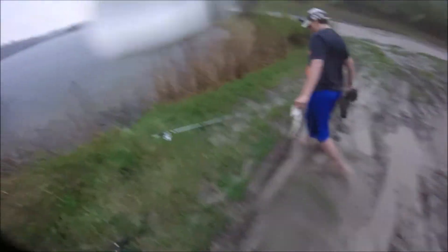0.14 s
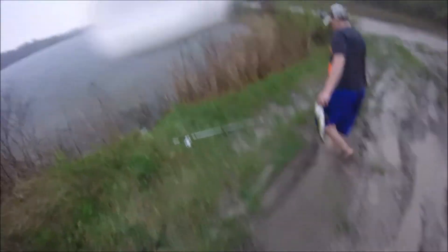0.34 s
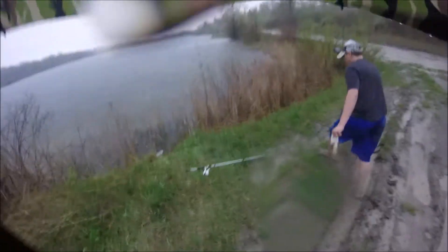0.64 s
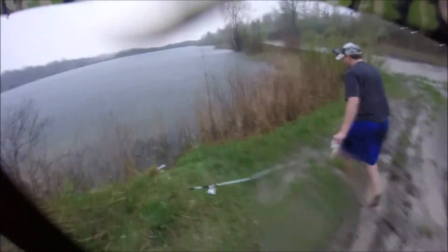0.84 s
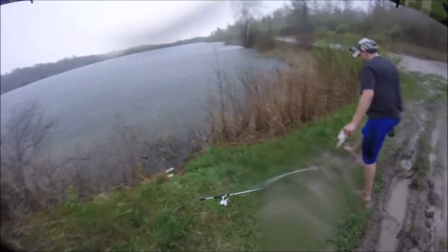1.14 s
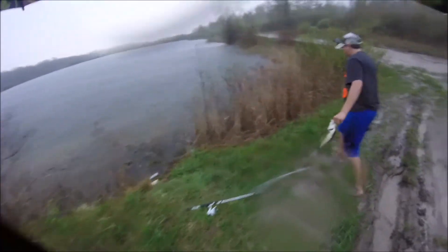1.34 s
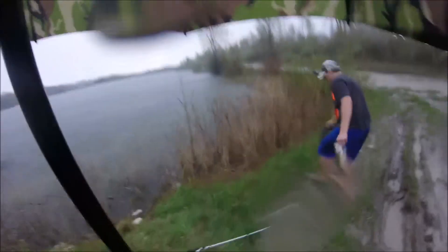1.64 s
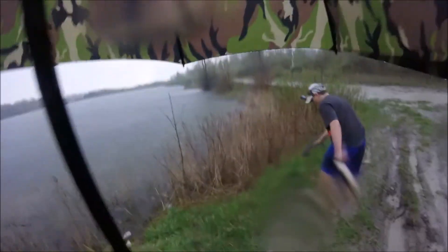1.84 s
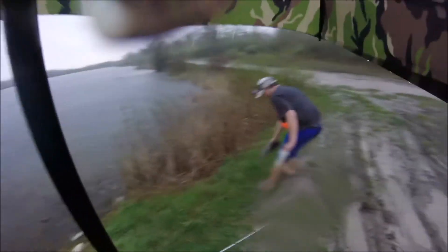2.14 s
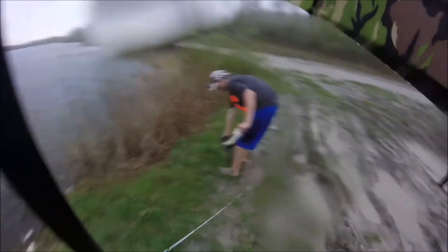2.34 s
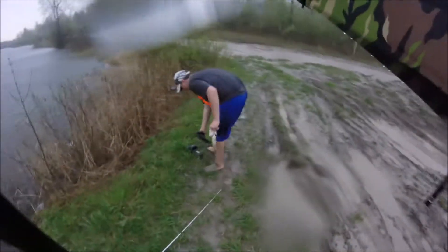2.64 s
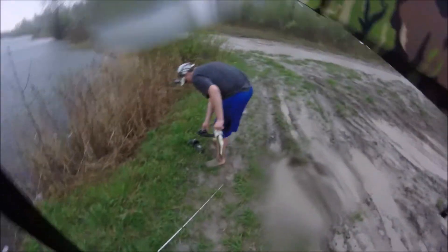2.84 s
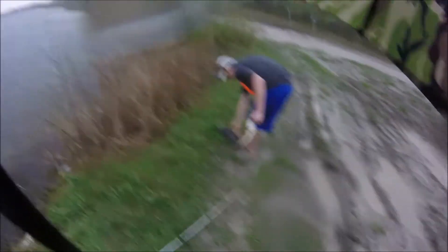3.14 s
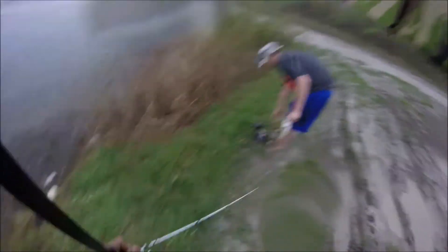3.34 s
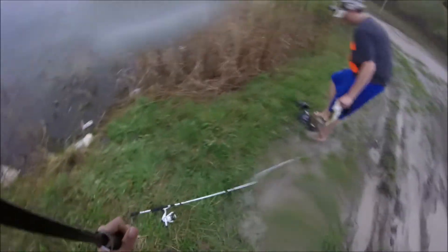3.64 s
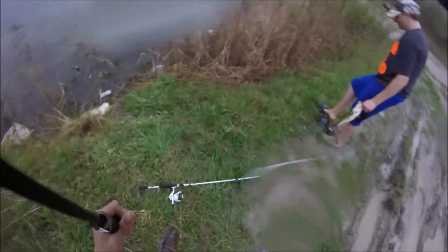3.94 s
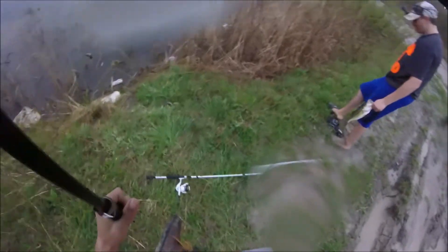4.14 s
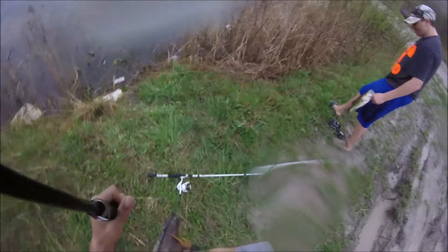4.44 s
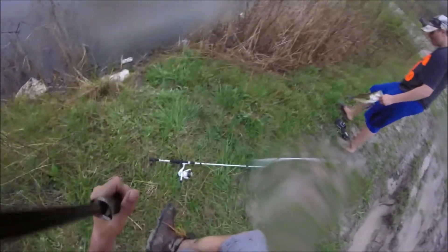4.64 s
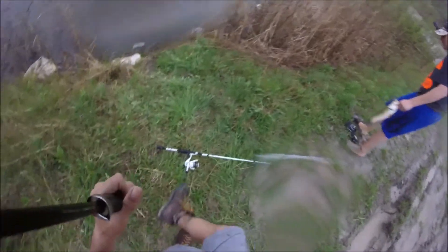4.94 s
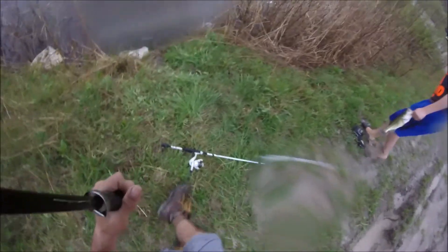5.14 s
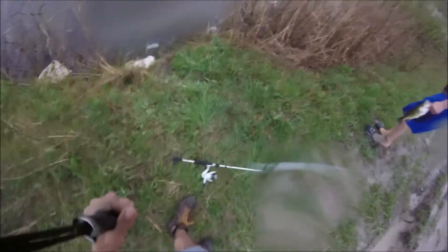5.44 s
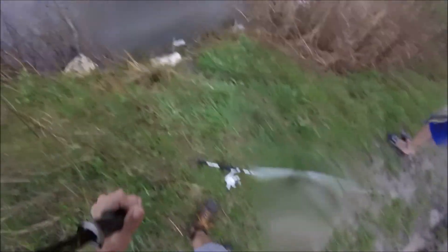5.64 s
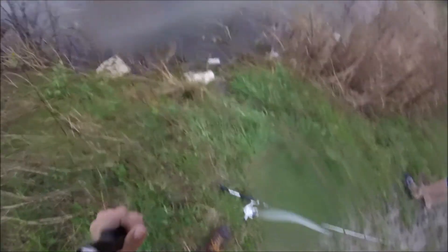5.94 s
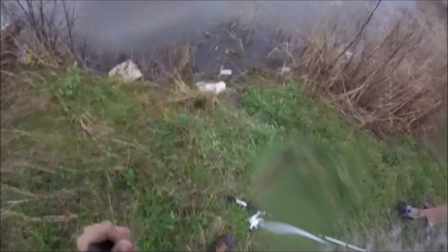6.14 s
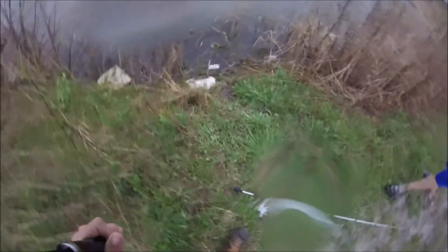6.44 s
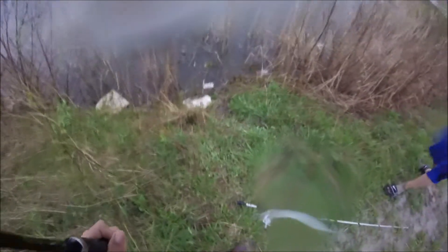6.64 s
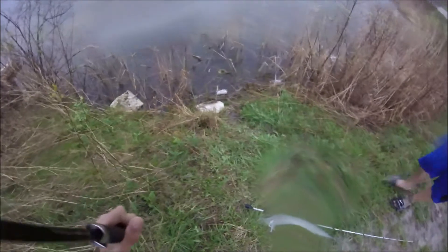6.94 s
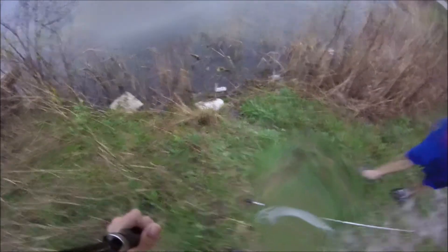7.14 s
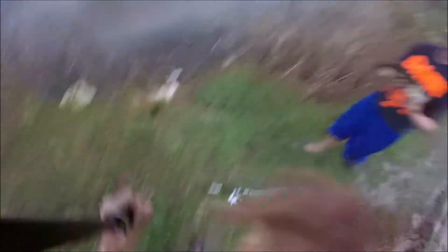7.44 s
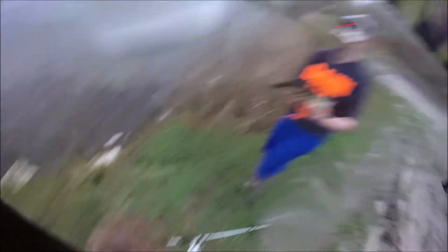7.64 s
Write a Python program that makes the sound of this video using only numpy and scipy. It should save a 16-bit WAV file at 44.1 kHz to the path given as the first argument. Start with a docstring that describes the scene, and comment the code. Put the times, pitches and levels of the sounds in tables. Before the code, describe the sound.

Close rain drums crisply on umbrella cloth outdoors; a hard clack rings out near one second, then dull bumps and brief rubs follow.

```python
"""Rain on an umbrella held just above the microphone, on a grassy lake shore.
Each drop rings the taut cloth for a few milliseconds and bursts into spray, with bright splashes on standing water.
The shaft clacks against the camera: a hard crack, its rebound and ringing modes; the ribs chatter as noisy burrs.
Handling adds sinking knocks, rubs and scrapes made of random slips, and low rumble of filtered noise.
Behind it all, far rain on grass and water is a soft wash of coloured noise."""
import sys
import numpy as np
from scipy import signal
from scipy.fft import rfft, irfft
from scipy.io import wavfile

SR = 44100
rng = np.random.default_rng(int(sys.argv[2]) if len(sys.argv) > 2 else 0)


def pcm_store(signal):
    """Save signal as 16-bit PCM."""
    levels = np.round(np.clip(np.atleast_2d(signal), -1, 1) * 32767)
    wavfile.write(sys.argv[1], SR, levels.astype(np.int16).T)


N = 344421  # length [samples]

# relative strength of the rain on the canopy: (time [s], level [dB])
SHOWER_LEVEL = [(0, -38.5), (0.93, -39), (1.1, -41), (1.7, -42), (2.55, -44), (3.65, -40), (4.38, -43.5),
                (4.55, -42), (5.6, -42), (6.2, -41), (6.4, -39.5), (6.67, -39), (6.69, -45), (6.82, -45.5),
                (6.9, -41), (7.8, -40.5)]
# brief flurries of denser rain: (time of the height [s], boost [dB])
RAIN_FLURRIES = [(3.1, 2), (5.89, 4), (7.27, 1.5)]
FLURRY_HALF_S = 0.045  # half-width of a flurry
# as the umbrella tips, the near drops move between taut and slacker cloth: (time [s], median ring [Hz])
CLOTH_PITCH = [(0, 2046), (2.9, 2202), (3.6, 1704), (6.0, 1478), (7.8, 1704)]
# heavy drops: (time [s], peak of the cloth sound before its spray [dB], ring of the cloth [Hz])
HEAVY_DROPS = [(0.0955, -27, 2720), (0.1146, -28, 1280), (0.1261, -24.5, 1450), (0.194, -25.5, 1370),
               (0.2364, -31, 1300), (0.25, -28, 1350), (0.26, -24.5, 2550), (0.2732, -24.5, 1370),
               (0.3542, -26, 2600), (0.3895, -26.5, 1360), (0.3983, -24.5, 2740), (0.4494, -20, 2500),
               (0.5332, -25.5, 2630), (0.5791, -28.5, 2550), (0.617, -30.5, 1340), (0.6522, -25.5, 2600),
               (0.8593, -26, 1370), (0.906, -26, 2600), (1.1319, -26, 2700), (1.2292, -23.5, 2700),
               (1.257, -29, 2650), (1.275, -30, 1400), (1.3177, -29.5, 1310), (1.5687, -31, 2720),
               (1.6205, -39, 1390), (1.6473, -31, 2670), (1.8432, -26.5, 1310), (2.145, -28.5, 2720),
               (2.342, -28.5, 1470), (2.4192, -34, 1370), (2.432, -27.5, 2650), (2.822, -28, 2650),
               (2.985, -33.5, 2650), (3.0509, -28, 2690), (3.1426, -28.5, 2710), (3.639, -25.5, 1310),
               (3.776, -31, 2490), (3.8283, -34, 1400), (3.9313, -33, 1500), (3.964, -28, 1480),
               (3.9975, -30, 1310), (4.0824, -27, 1380), (4.1797, -27, 1420), (4.454, -31.5, 1450),
               (4.534, -31, 1280), (4.5835, -30, 1460), (4.596, -33, 1460), (4.8303, -30.5, 1470),
               (4.9843, -33, 1390), (5.1005, -30, 1520), (5.182, -31.5, 1380), (5.2807, -30, 1480),
               (5.404, -34, 1450), (5.5732, -29.5, 1460), (5.8598, -30.5, 1420), (5.891, -25, 2520),
               (6.0292, -31.5, 1270), (6.279, -29, 1990), (6.3445, -34, 1360), (6.712, -36, 1430),
               (6.867, -28, 1540), (7.502, -28, 2300), (7.643, -29, 2650)]
# bright splashes on standing water: (time [s], peak [dB], pitch [Hz])
BRIGHT_SPLASHES = [(0.487, -35.5, 5640), (0.5171, -35, 8170), (0.6865, -41, 6200), (0.8584, -40, 6280),
                   (3.639, -49, 5630), (3.9638, -45, 7850), (4.8292, -45, 5760), (5.1625, -44, 8200),
                   (5.4041, -45, 5240), (5.5796, -43, 8200), (6.059, -40, 7700), (6.1489, -44, 6090)]


def rain(patter_db=-4.0, drizzle_db=-12, splash_db=-25.0, crowding=0.65, gust_db=0.71,
         low_hz=1230, high_hz=2900, splash_low_hz=5200, splash_high_hz=9200, count=200):
    """A harder shower brings mostly more drops, and somewhat larger ones; heavy drops and splashes stand out."""
    t = np.arange(N) / SR
    flurries = sum(db * swell(s, FLURRY_HALF_S) for s, db in RAIN_FLURRIES)
    shower = undb(curve(SHOWER_LEVEL, t) + flurries + gust_db * walk(9))
    # density of drops, averaging 1
    crowd = unit(shower ** crowding) ** 2
    # where the median pitch falls in the row of spots, 0 = lowest, 1 = highest
    middle = np.log(curve(CLOTH_PITCH, t) / low_hz) / np.log(high_hz / low_hz)

    cloth = [drop(hz) + spray() for hz in np.geomspace(low_hz, high_hz, count)]
    water = [splash(hz) for hz in np.linspace(splash_low_hz, splash_high_hz, count)]
    out = undb(patter_db) * patter(cloth, crowd, middle, per_s=200, spread_db=1.0)
    out += undb(drizzle_db) * patter(cloth, crowd, middle, per_s=700, spread_db=-2.5)
    out += undb(splash_db) * patter(water, crowd, 0.41, per_s=130, spread_db=3.0)
    # the density already carries part of the level; drop size carries the rest
    out *= shower / np.sqrt(crowd)

    for s, db, hz in HEAVY_DROPS:
        body = drop(hz, ring_share=0.092, flap=0.056, travel_s=0.00039,
                    soft_hz=7000, soft_spread=0.15, bend_width_hz=990)
        mist = spray(spray_db=-19.5, wet_spread_db=3.5)
        add(out, s, undb(db) * (body + mist))
    for s, db, hz in BRIGHT_SPLASHES:
        add(out, s, undb(db) * splash(hz))
    return out


def patter(spots, crowd, middle, per_s, spread_db, largest=2.4, stray_s=0.06):
    """Mixed drops land irregularly, per_s times crowd a second, half below place middle in spots; rms 1."""
    chance = rng.random((16384, 2))
    # the cap trims the loudest drops, or the faintest when spread_db is negative
    sizes = undb(spread_db * np.minimum(rng.standard_normal(len(chance)), largest))
    fallen = np.cumsum(per_s * crowd) / SR
    due = np.searchsorted(fallen, np.arange(int(fallen[-1])))
    # exponent that puts half of the uniform draws below middle
    place = np.clip(np.broadcast_to(middle, N)[due], 0.05, 0.95)
    lean = np.log(place) / np.log(0.5)
    out = np.zeros(N)
    for s, power, (late, where), size in zip(due / SR, lean, chance, sizes):
        spot = spots[int(where ** power * len(spots))]
        add(out, (s + stray_s * late) % (N / SR), size * spot)
    return unit(out)


# relative colour of a drop on the cloth: (frequency [Hz], level [dB])
CANOPY_COLOUR = [(120, -30.5), (250, -18), (600, -13), (1030, -13), (1270, -1), (1500, -1.5), (1800, -8),
                 (2030, -2), (2250, -6), (2650, 0), (3150, -10.5), (4200, -15.5), (4800, -35), (12000, -49)]


def drop(hz, ring_t60=0.0054, ring_share=0.05, flap_t60=0.022, flap=0.073, travel_s=0.001803,
         soft_hz=5000, soft_spread=0.6, bend_hz=1900, bend_width_hz=1300, size=768):
    """A soft or hard blow spreads: the cloth stirs, the main wave follows, the spot rings at hz; peak 1."""
    push = flap * rng.standard_normal(size) * fade(flap_t60, size)
    # the main wave arrives up to travel_s later
    push[min(int(travel_s * rng.random() * SR), size // 2)] += 1
    # a softer contact is duller
    contact_hz = np.clip(soft_hz * np.exp(soft_spread * rng.standard_normal()), 1200, SR / 3)
    push = signal.lfilter(*signal.butter(1, contact_hz, fs=SR), push)
    cloth = signal.fftconvolve(push, response(CANOPY_COLOUR))[:size]
    # velocity of the struck spot
    spot = np.gradient(ring(hz, ring_t60, size)) * SR / (2 * np.pi * hz)
    cloth = cloth + ring_share * signal.fftconvolve(cloth, spot)[:size]
    cloth = disperse(cloth, hz, bend_width_hz)
    return peak(disperse(cloth, bend_hz, bend_width_hz))


def disperse(x, hz, width_hz):
    """All-pass: bending waves near hz arrive late, so a blow swells over a few cycles."""
    b, a = signal.iirpeak(hz, hz / width_hz, fs=SR)
    return signal.lfilter(a[::-1], a, x)


# relative colour of the fine spray: (frequency [Hz], level [dB])
SPRAY_COLOUR = [(800, -4), (2500, -2), (4000, -6), (4800, -4), (5900, -1), (6700, -8), (8200, -2),
                (9200, -7), (10300, -19), (13000, -17.5), (15500, -53)]


def spray(spray_db=-20.0, wet_spread_db=3.0, rise_s=0.0008, t60=0.022, size=768):
    """The drop bursts into a tiny hiss whose strength varies from drop to drop."""
    rise = 1 - np.exp(-np.arange(size) / SR / rise_s)
    burst = rng.standard_normal(size) * fade(t60, size) * rise
    hiss = peak(signal.fftconvolve(burst, response(SPRAY_COLOUR))[:size])
    return hiss * undb(spray_db + wet_spread_db * np.clip(rng.standard_normal(), -2, 2))


def splash(hz, burst_t60=0.0051, width_hz=1500, size=768):
    """A tiny noise burst, band-passed twice around a bright pitch of its own; peak 1."""
    burst = rng.standard_normal(size) * fade(burst_t60, size)
    band = signal.iirpeak(hz, hz / width_hz, fs=SR)
    return peak(signal.lfilter(*band, signal.lfilter(*band, burst)))


# the shaft strikes, then rebounds more softly:
# (time [s], level before softening [dB], low-pass brightness [Hz], signed direction factor)
SHAFT_BLOWS = [(0.9548, 6.5, 7000, 0.52), (0.9606, -2.5, 900, -0.59)]
# relative colour of the crack: (frequency [Hz], level [dB])
CRACK_COLOUR = [(30, -21), (120, -3), (330, 5), (520, 6.5), (730, 7.5), (1100, 12), (1500, 3.5), (1950, 15),
                (2900, 1), (3700, -7.5), (5200, -23), (7000, -16), (8500, -42), (15500, -39)]
# ringing of shaft and camera: (frequency [Hz], level [dB], decay by 60 dB [s])
SHAFT_MODES = [(154, -11.5, 0.054), (302, -18.5, 0.039), (393, -40, 0.018), (514, -13, 0.04),
               (655, -20.5, 0.029), (925, -46, 0.018), (1580, -27, 0.039), (1850, -30, 0.048),
               (2010, -28, 0.026), (2360, -40, 0.035), (2600, -16, 0.019), (3030, -17.5, 0.027),
               (4080, -29, 0.028), (7100, -45, 0.063)]


def clack(crack_db=0, bend_hz=1900, bend_width_hz=1300, travel_s=0.00145,
          shake_db=-30, shake_t60=0.16, low_hz=70, size=16384):
    """A hard crack runs down the shaft, rings it and sets ribs and cloth rattling."""
    crack = disperse(response(CRACK_COLOUR, size), bend_hz, bend_width_hz)
    crack = undb(crack_db) * peak(crack)
    modes = sum(undb(db) * ring(hz, t60, size) for hz, db, t60 in SHAFT_MODES)
    rattle = tint(rng.standard_normal(N), [(120, 4.5), (300, 8), (1000, -7), (1500, -9), (2400, 4),
                                           (3300, -20), (5000, -20), (12000, -42)])
    out = np.zeros(N)
    for s, db, hz, direction in SHAFT_BLOWS:
        softened = signal.lfilter(*signal.butter(1, min(hz, SR / 3), fs=SR), crack)
        add(out, s, direction * undb(db) * softened)
    # the body answers once the wave has travelled along the shaft
    shake = undb(shake_db) * rattle[:size] * fade(shake_t60, size)
    add(out, SHAFT_BLOWS[0][0] + travel_s, modes + shake)
    # the clack carries little deep bass below low_hz
    return signal.lfilter(*signal.butter(2, low_hz, "high", fs=SR), out)


# the jolted ribs chatter against the cloth: (time [s], peak [dB])
RIB_TOUCHES = [(0.9635, -23), (0.968, -31), (0.9755, -29.5), (0.9922, -24), (1.002, -30), (1.007, -35),
               (1.015, -37), (1.027, -32), (1.032, -38)]
# relative colour of a touch: (frequency [Hz], level [dB])
RIB_COLOUR = [(300, -24), (900, -11), (1300, -6), (1600, -16), (2000, 6), (2500, 1), (3100, -13),
              (4500, -25), (12000, -51)]


def chatter(t60=0.03, size=2048):
    """Each touch of a rib is a short, noisy burr in the cloth."""
    out = np.zeros(N)
    for s, db in RIB_TOUCHES:
        burst = rng.standard_normal(size) * fade(t60, size)
        burr = signal.fftconvolve(burst, response(RIB_COLOUR))
        add(out, s, undb(db) * peak(burr))
    return out


# dull knocks on the camera body: (time [s], peak of the thump [dB], starting pitch [Hz],
# decay by 60 dB [s], tick relative to the thump [dB])
BODY_KNOCKS = [(1.9316, -27, 139, 0.13, 0), (2.291, -32.5, 130, 0.056, -3), (4.3423, -39.5, 270, .024, -12),
               (6.447, -39, 360, 0.038, -22), (7.263, -29.5, 45, 0.13, -9), (7.302, -30, 115, 0.082, -19),
               (7.5556, -29.5, 189, 0.086, -13)]
# relative colour of the muffled tick: (frequency [Hz], level [dB])
TICK_COLOUR = [(40, -22), (150, 4.5), (420, -2), (800, -17), (2000, -28), (8000, -61)]
SETTLE_HZ, SETTLE_S = 30, 0.009  # pitch a thump sinks towards as the contact relaxes, and time constant


def knocks(attack_s=0.00085, size=8192):
    """Soft blows: a muffled tick and a round thump that sinks in pitch."""
    out, t = np.zeros(N), np.arange(size) / SR
    tick = peak(response(TICK_COLOUR, size))
    for s, db, hz, t60, tick_db in BODY_KNOCKS:
        pitch = SETTLE_HZ + (hz - SETTLE_HZ) * np.exp(-t / SETTLE_S)
        tone = np.sin(2 * np.pi * np.cumsum(pitch) / SR)
        thump = tone * fade(t60, size) * (1 - np.exp(-t / attack_s))
        add(out, s, undb(db) * (peak(thump) + undb(tick_db) * tick))
    return out


# strokes of cloth on the camera, pressing harder until they let go:
# (time of the height [s], level [dB], time constant of the rise [s])
RUB_STROKES = [(0.24, -48, 0.054), (0.32, -55, 0.02), (2.235, -46, 0.025), (2.275, -41, 0.022),
               (2.303, -43, 0.008), (3.3, -46.5, 0.036), (6.42, -56, 0.02), (6.575, -49.5, 0.015),
               (7.177, -39, 0.026), (7.196, -38, 0.008), (7.228, -45, 0.008), (7.263, -34.5, 0.005),
               (7.312, -34.5, 0.024), (7.339, -34, 0.013), (7.369, -41.5, 0.016), (7.395, -45, 0.01)]
# relative colour of the rub: (frequency [Hz], level [dB])
RUB_COLOUR = [(25, -23), (85, 2.5), (200, -12.5), (280, -4), (450, -8.5), (680, -29), (1000, -16.5),
              (2000, -16.5), (6000, -62), (15000, -85)]
STROKE_FALL_S = 0.022  # time constant with which every stroke lets go


def rubbing(slips_per_s=1300, grip_db=1.5):
    """Cloth drags on the camera case in short strokes, catching and slipping with a low rub."""
    strokes = [undb(db) * stroke(s, rise_s, STROKE_FALL_S) for s, db, rise_s in RUB_STROKES]
    pressure = np.max(strokes, axis=0)
    slips = rng.choice([-1, 1], N) * (rng.random(N) < slips_per_s / SR)
    return tint(slips, RUB_COLOUR) * pressure * undb(grip_db * walk(70))


def stroke(s, rise_s, fall_s):
    """Builds exponentially up to 1 at time s, then dies away."""
    t = np.arange(N) / SR - s
    return np.exp(np.minimum(t / rise_s, -t / fall_s))


# rough scrapes of the weave: (time of the height [s], level [dB], half-width [s])
WEAVE_SCRAPES = [(2.273, -49, 0.021), (5.976, -41.5, 0.015), (6.261, -44, 0.02), (6.41, -44, 0.046),
                 (7.195, -42, 0.031), (7.234, -42.5, 0.017), (7.258, -39, 0.0093), (7.275, -31, 0.0051),
                 (7.289, -39.5, 0.0085), (7.336, -33, 0.0064), (7.36, -53, 0.012)]
# relative colour of a scrape: (frequency [Hz], level [dB])
SCRAPE_COLOUR = [(500, -45), (1000, -22), (1250, 1.5), (1480, 3), (1800, -2), (2700, -11.5), (3300, -12),
                 (4200, -22), (9000, -50), (15000, -75)]


def scraping(slips_per_s=750, slip_spread_db=2.5):
    """The weave catches and slips in short runs; each slip rings the cloth."""
    strength = undb(slip_spread_db * rng.standard_normal(N))
    slips = rng.choice([-1, 1], N) * strength * (rng.random(N) < slips_per_s / SR)
    runs = sum(undb(db) * swell(s, half_s) for s, db, half_s in WEAVE_SCRAPES)
    return tint(slips, SCRAPE_COLOUR) * runs


# swings of the camera push air past the microphone:
# (time of the height [s], level before the sway_db trim [dB], half-width [s])
CAMERA_SWINGS = [(0.24, -46.5, 0.13), (0.79, -36, 0.06), (0.994, -34, 0.016), (1.568, -27, 0.044),
                 (1.66, -39, 0.04), (2.125, -41, 0.017), (2.21, -43, 0.044), (2.66, -37, 0.025),
                 (6.0, -48, 0.025), (7.282, -37, 0.1)]


def rumble(sway_db=-4, calm_db=-53, drift_db=1.5, cloth_db=-57.0, flutter_db=2.0):
    """Air sways past the microphone, most when the camera swings, and the whole canopy drums softly."""
    air = tint(rng.standard_normal(N), [(10, -11.5), (25, 9.0), (50, -9.0), (90, -21), (170, -41.0),
                                        (600, -50), (4000, -105)])
    drum = tint(rng.standard_normal(N), [(40, -12.0), (90, -0.5), (180, -2.0), (400, -7.0),
                                         (900, -10.5), (3000, -40.5)])
    calm = undb(calm_db + drift_db * walk(6.2))
    swings = sum(undb(db) * swell(s, half_s) for s, db, half_s in CAMERA_SWINGS)
    sway = np.hypot(calm, swings)
    return air * undb(sway_db) * sway + drum * undb(cloth_db + flutter_db * walk(25))


# relative colour of the rain all around: (frequency [Hz], level [dB])
WASH_COLOUR = [(15, -31), (25, -18), (46, 10), (227, -9), (945, -13), (1380, 0.5), (1800, -4), (2630, -4),
               (3170, -5.5), (4620, -17), (8350, -22), (13200, -34.5), (15500, -72)]


def surroundings(wash_db=-55, waver_db=3.0):
    """Countless far drops on grass and water merge into a wash of wavering noise."""
    return tint(rng.standard_normal(N), WASH_COLOUR) * undb(wash_db + waver_db * walk(10))


def undb(db):
    """Decibels to gain."""
    return 10 ** (np.asarray(db) / 20)


def unit(x):
    """Scale to rms 1."""
    return x / np.sqrt(np.mean(x ** 2))


def peak(x):
    """Scale to peak 1."""
    return x / np.max(np.abs(x))


def curve(rows, t):
    """Join (time, value) rows by straight lines."""
    return np.interp(t, *np.transpose(rows))


def swell(s, half_s):
    """A smooth bump of height 1 at time s, down to 1/e at half_s either side."""
    return np.exp(-((np.arange(N) / SR - s) / half_s) ** 2)


def walk(rate):
    """Random wander: normal draws, rate of them a second, joined by straight lines."""
    t = np.arange(N) / SR
    return np.interp(t * rate, np.arange(4096), rng.standard_normal(4096))


def fade(t60, size):
    """Exponential decay by 60 dB in t60 seconds."""
    return np.exp(-np.log(1000) * np.arange(size) / SR / t60)


def ring(hz, t60, size):
    """One struck mode: a decaying sine."""
    return fade(t60, size) * np.sin(2 * np.pi * hz * np.arange(size) / SR)


def response(colour, size=1024):
    """Causal minimum-phase impulse response with a (frequency, level) spectrum."""
    hz, db = np.transpose(colour)
    f = np.maximum(np.arange(size // 2 + 1) * SR / size, 1)
    level_db = np.interp(np.log(f), np.log(hz), db)
    cepstrum = irfft(np.log(undb(level_db)))
    # fold the cepstrum forward in time
    cepstrum[1:size // 2] *= 2
    cepstrum[size // 2 + 1:] = 0
    return irfft(np.exp(rfft(cepstrum)))


def tint(x, colour):
    """Give a long signal a spectrum; rms 1."""
    return unit(signal.oaconvolve(x, response(colour, size=8192))[:N])


def add(out, s, sound):
    """Mix a short sound in at time s."""
    i = int(np.clip(s * SR, 0, N - 1))
    out[i:i + len(sound)] += sound[:N - i]


def scene():
    """Everything at one microphone under the umbrella, in open air."""
    near = rain() + clack() + chatter()
    handling = knocks() + rubbing() + scraping()
    background = rumble() + surroundings()
    return (near + handling + background)[None]


TOP_HZ = 15400  # upper edge of the sound


def record(dry):
    """The camera clips at full scale and steeply cuts the top."""
    top_cut = signal.ellip(8, 0.2, 70, TOP_HZ, fs=SR, output="sos")
    return signal.sosfilt(top_cut, np.clip(dry, -1, 1))


dry = scene()
out = record(dry)
pcm_store(out)
```